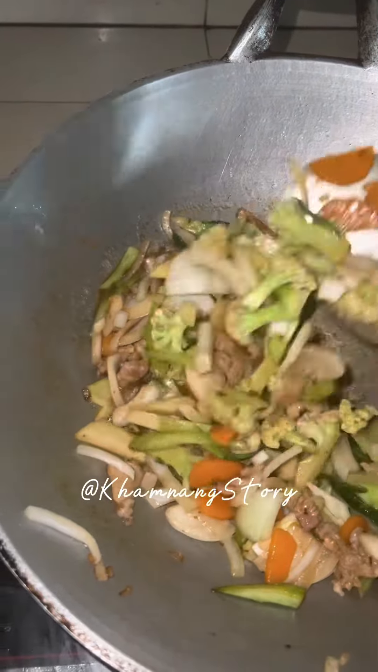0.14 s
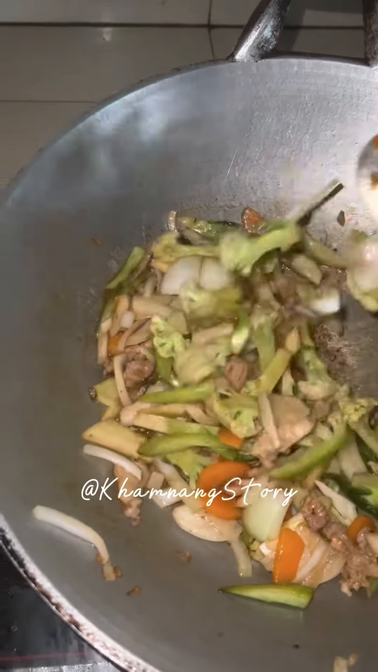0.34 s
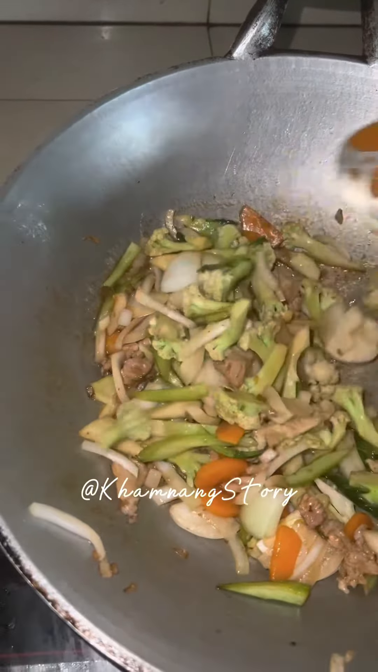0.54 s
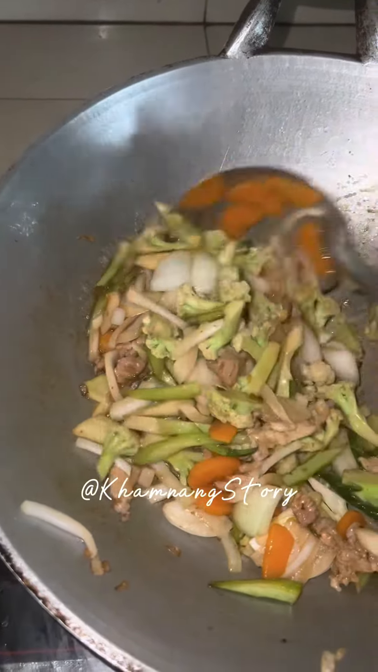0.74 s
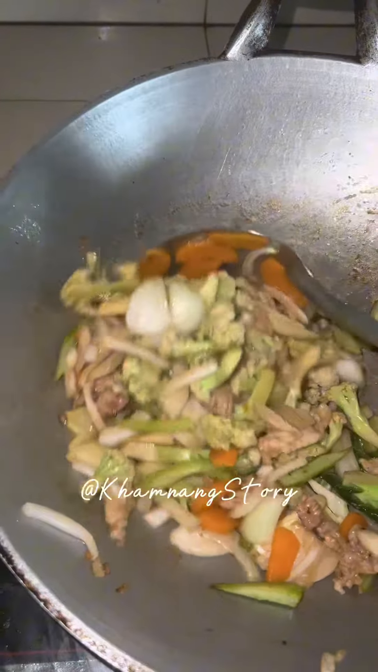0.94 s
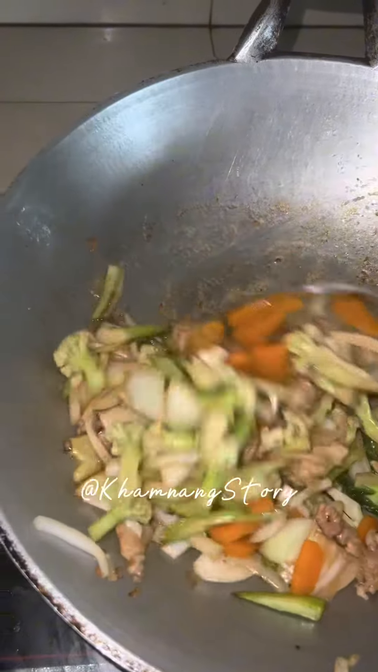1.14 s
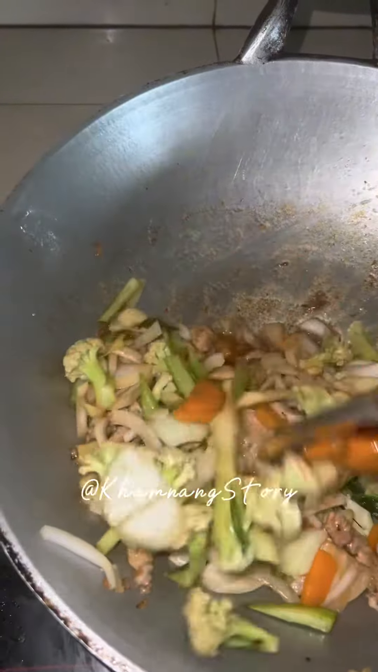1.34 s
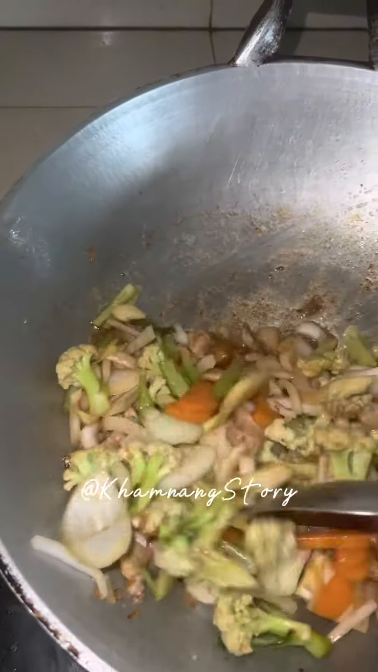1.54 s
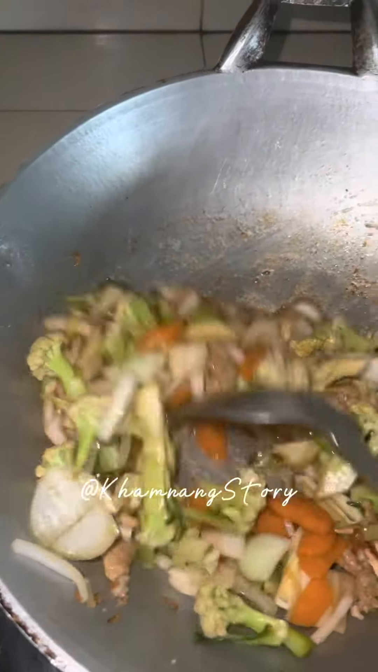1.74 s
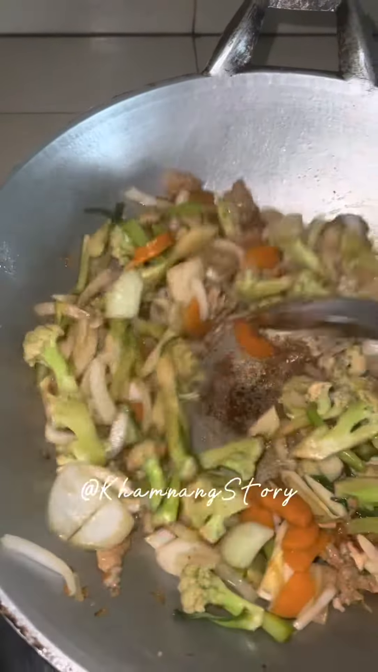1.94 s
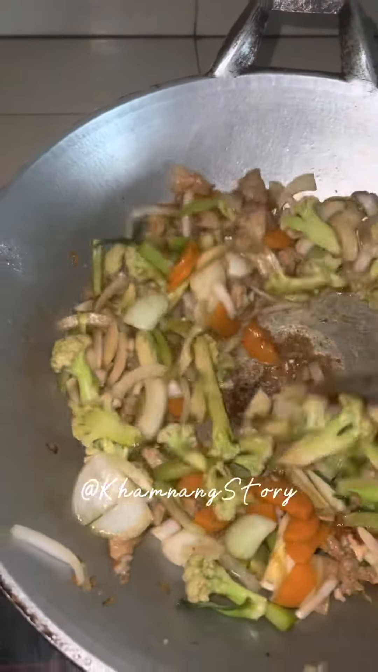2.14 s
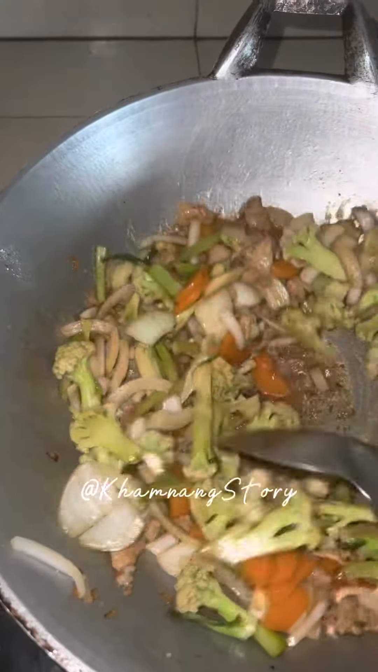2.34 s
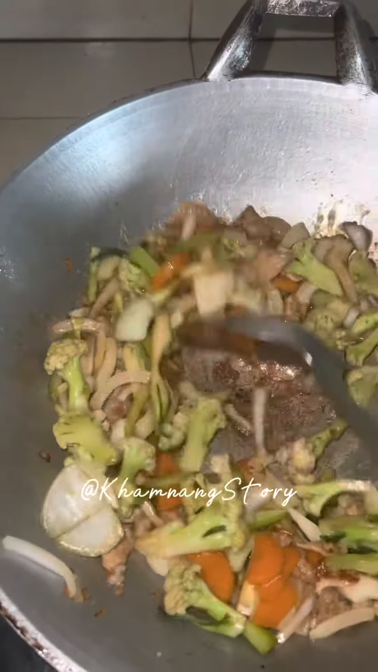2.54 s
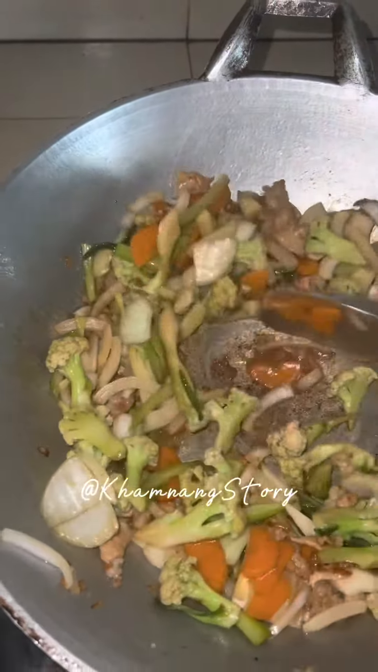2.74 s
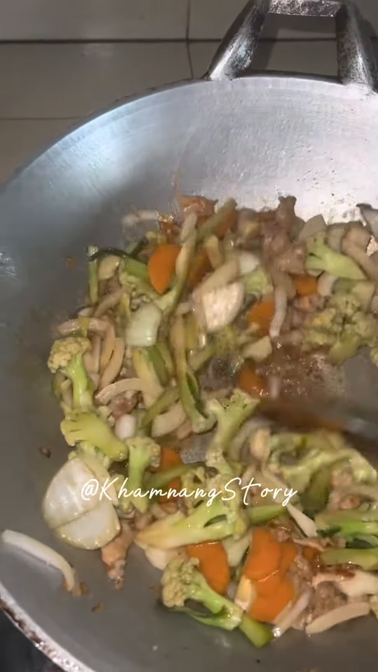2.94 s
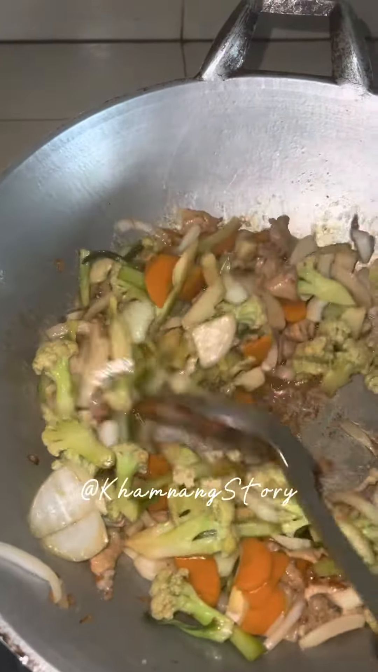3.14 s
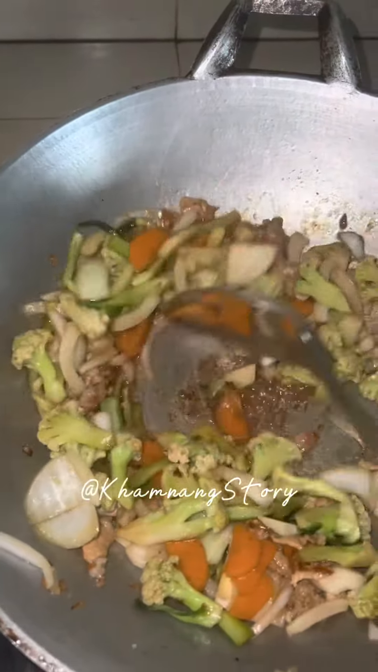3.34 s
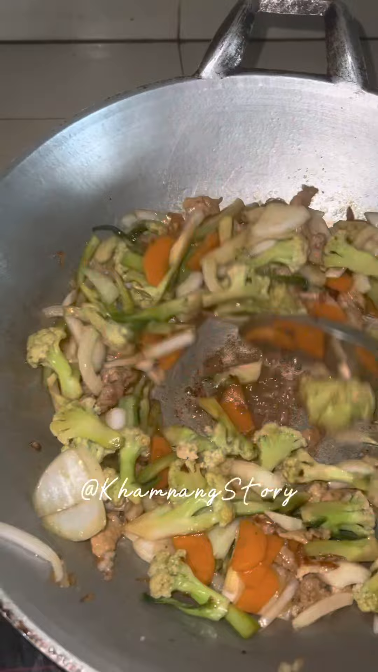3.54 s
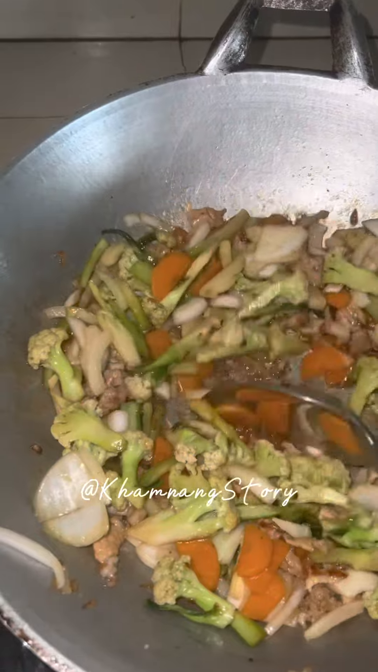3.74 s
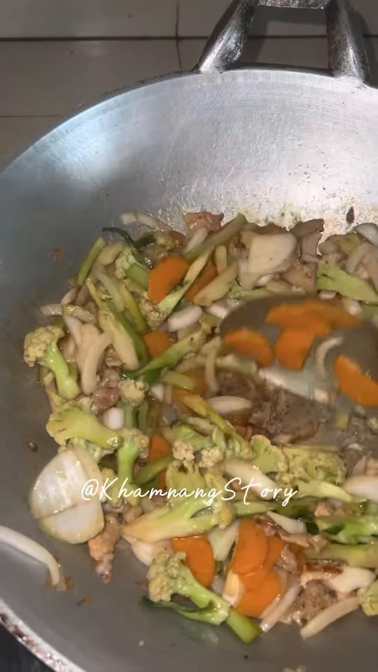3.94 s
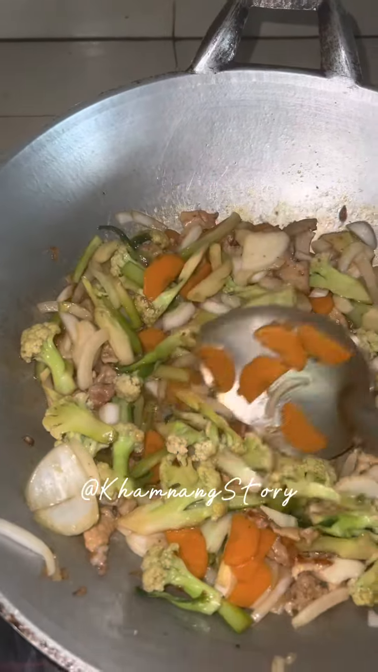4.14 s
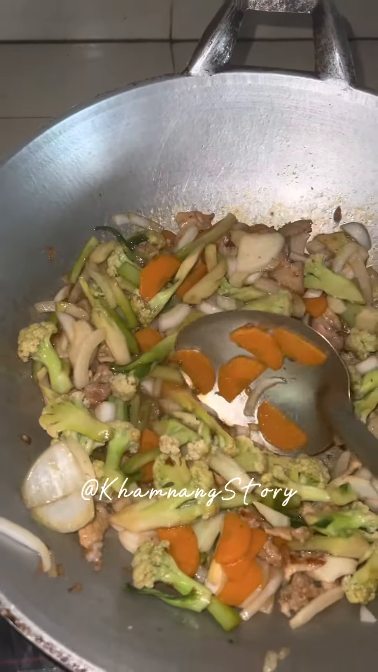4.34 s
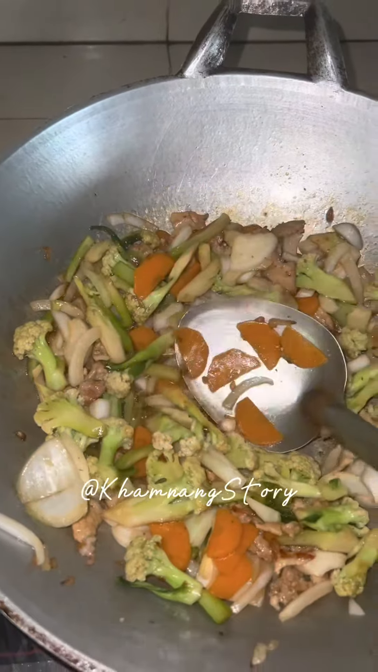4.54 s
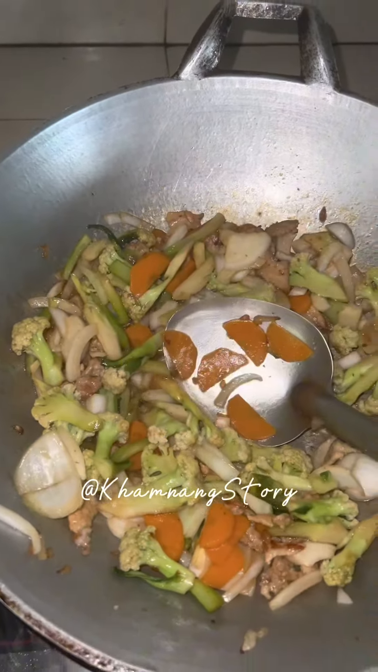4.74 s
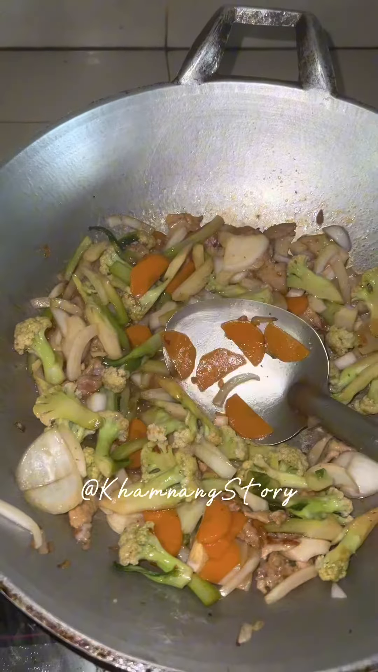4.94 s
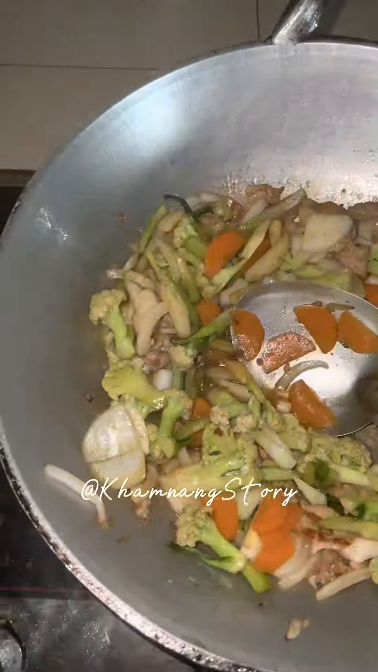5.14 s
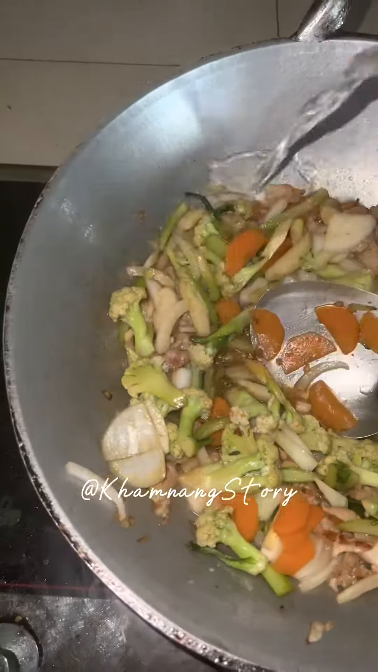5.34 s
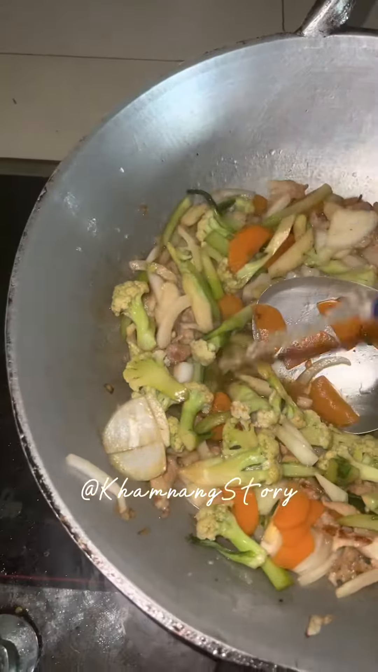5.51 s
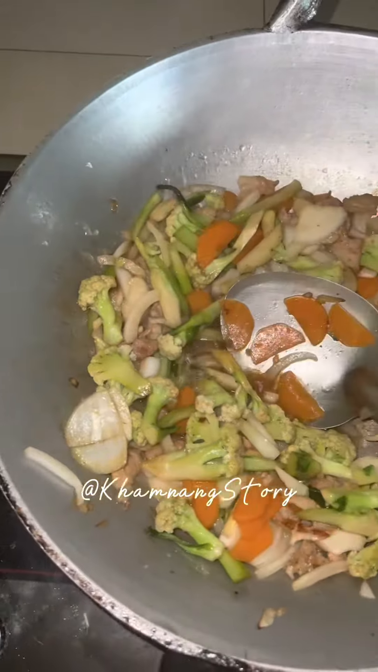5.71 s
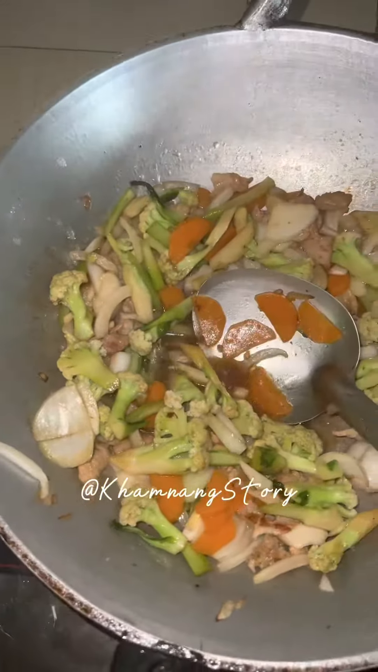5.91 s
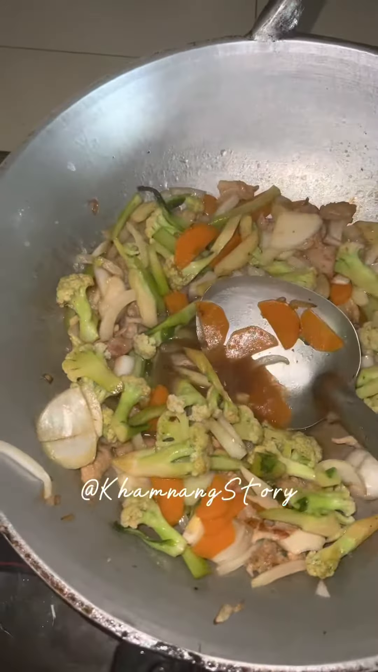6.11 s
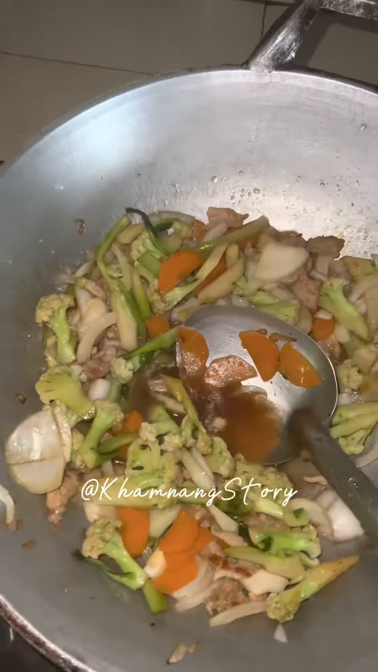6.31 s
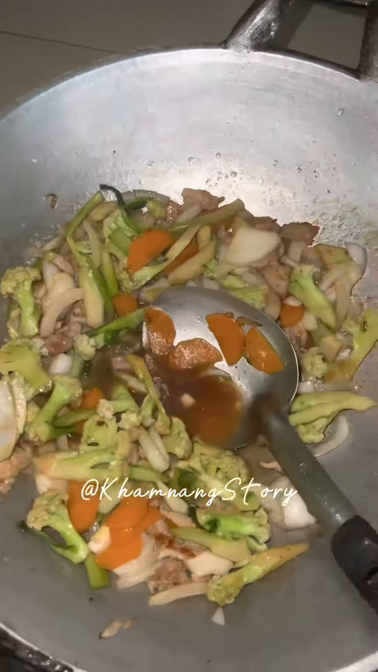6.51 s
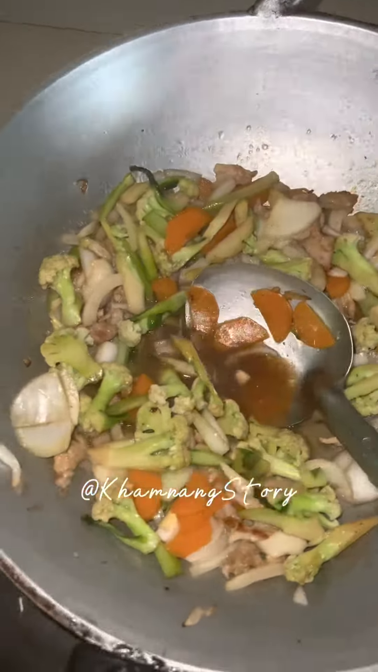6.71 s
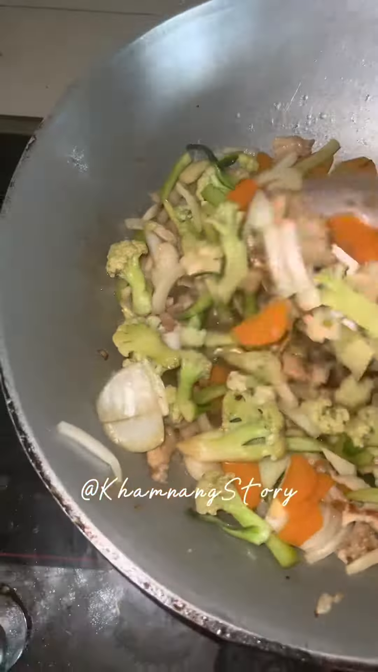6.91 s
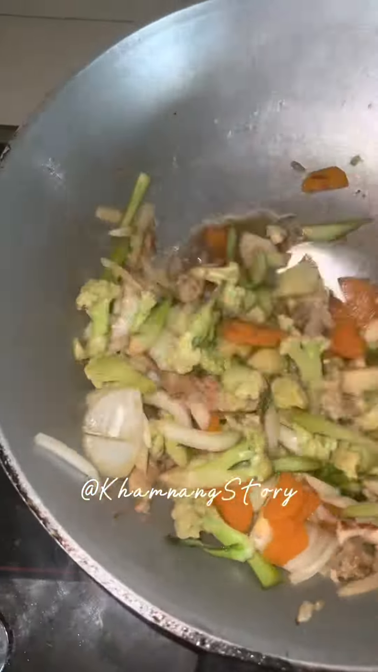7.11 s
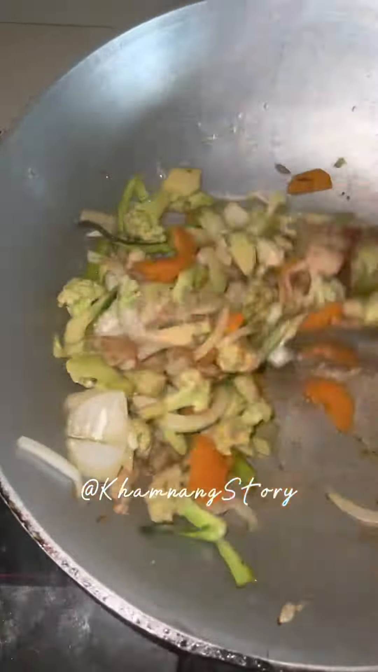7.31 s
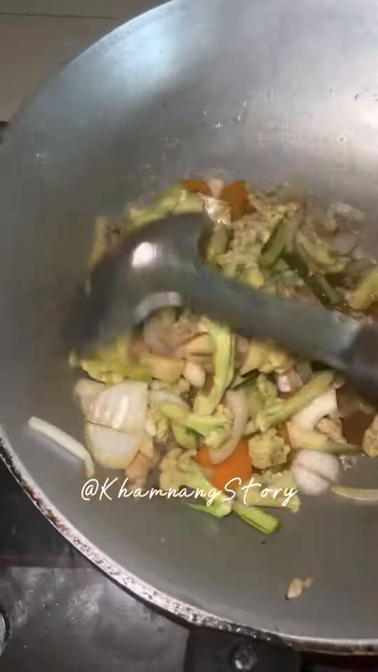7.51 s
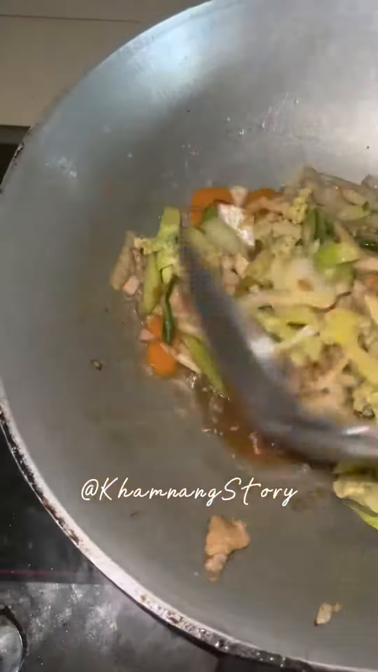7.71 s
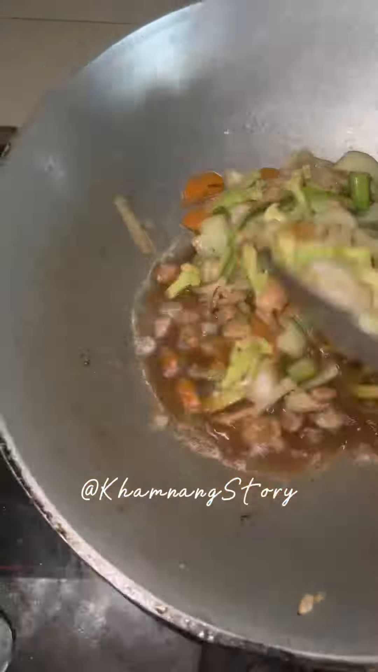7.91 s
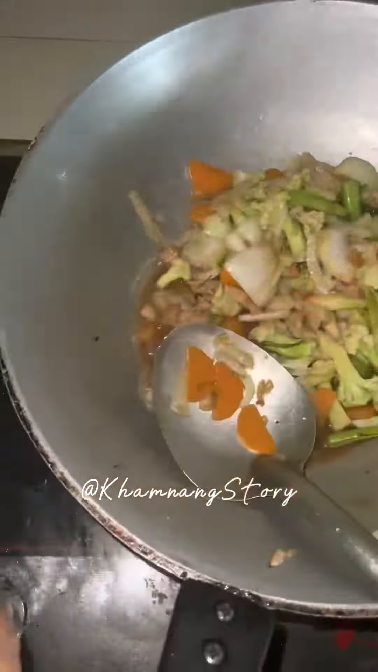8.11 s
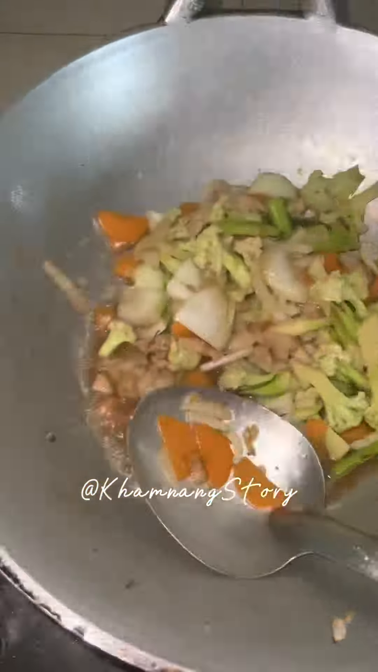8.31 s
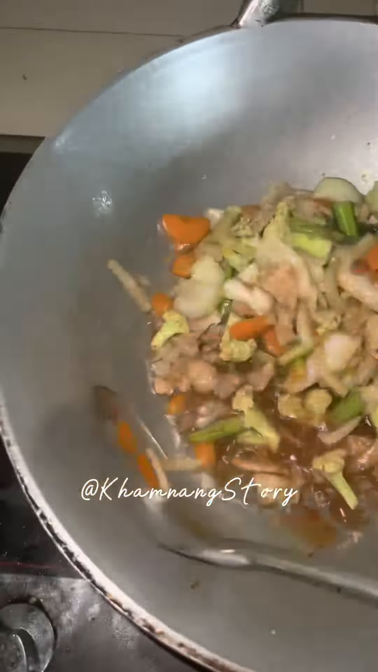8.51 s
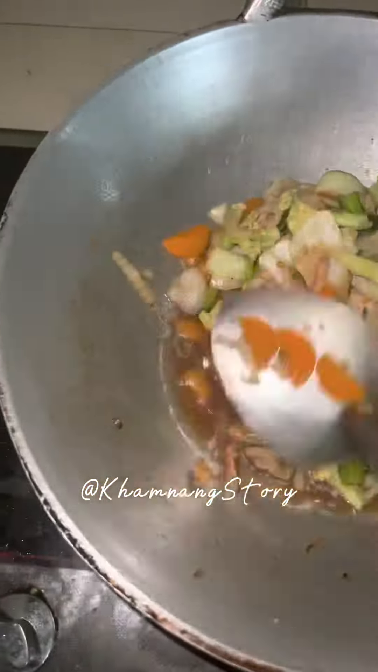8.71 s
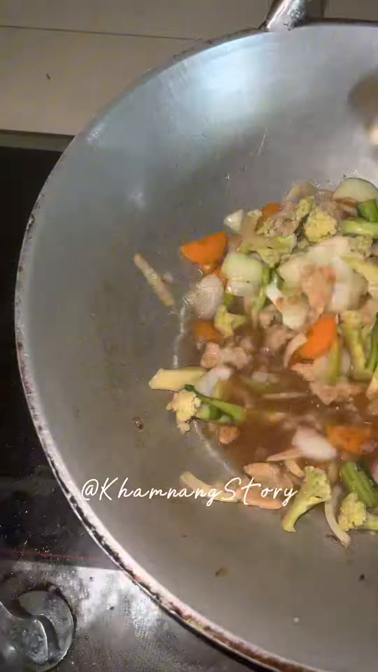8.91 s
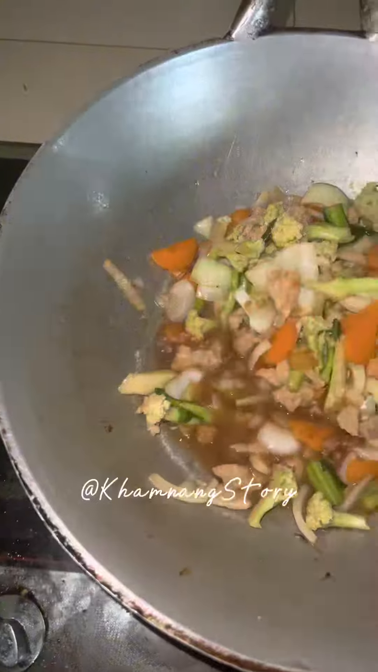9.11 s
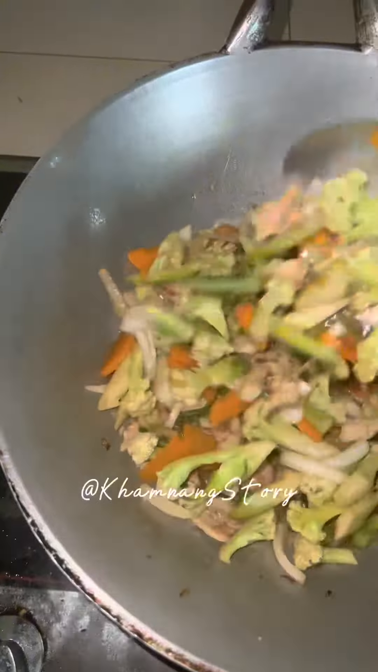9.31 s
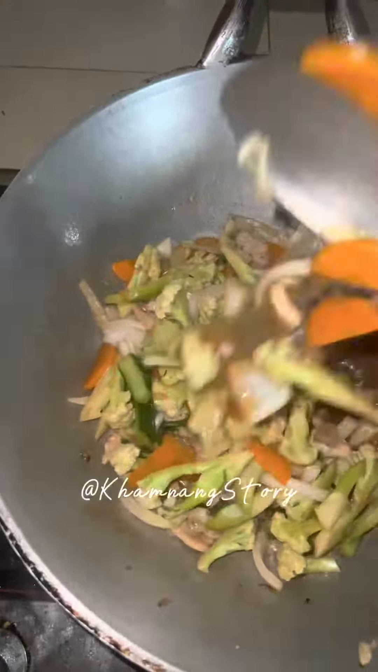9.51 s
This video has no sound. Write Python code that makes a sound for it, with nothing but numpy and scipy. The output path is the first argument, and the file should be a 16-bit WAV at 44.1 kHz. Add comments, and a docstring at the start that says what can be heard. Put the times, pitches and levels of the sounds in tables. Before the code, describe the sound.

A steel ladle works food in a wok, heard very close. First, slow-motion knocks with short damped metallic ring, rough scraping and grainy frying over swelling deep rumble. Around five seconds the pitch of everything glides upward and the sizzle thins and fades; from six and a half seconds, bright hurried taps rattle irregularly to the end.

```python
"""A steel ladle knocks and scrapes a wok of sizzling vegetables over a rumbling burner, close to a phone.
The frying and the burner are shaped noise; blows and strokes ring a bank of fading steel modes.
The scene first plays in slow motion, then speeds up about tenfold, so that the resonances, the rumble
and the colour of the two microphone ports glide upward and the strokes crowd into quick clinks."""
import sys
import numpy as np
from scipy import signal
from scipy.io import wavfile
from scipy.ndimage import uniform_filter1d

SR = 44100
rng = np.random.default_rng(int(sys.argv[2]) if len(sys.argv) > 2 else 0)


def wrap_up_sound(samples):
    """Save the sound to the file named by the first command line argument, as 16-bit audio."""
    columns = np.atleast_2d(samples).T
    # keep every value between -1 and 1, then stretch to whole-number steps
    tamed = np.clip(columns, -1, 1)
    steps = np.round(tamed * 32767).astype(np.int16)
    wavfile.write(sys.argv[1], SR, steps)


def ratio_of_db(decibels):
    """Turn decibels (scalar or array-like) into linear amplitude factors; 0 dB maps to 1."""
    return 10 ** (np.asarray(decibels, float) / 20)


N = 426006  # length in samples

# How fast the scene plays compared with its slow-motion start.
# Each row: time in seconds, speed factor. Pitches below are slow-motion pitches unless called "heard".
SPEED = [(0, 1.003), (5.06, 0.98), (5.12, 2.9), (5.7, 4.86), (6.3, 6.8), (6.79, 8.97), (7.4, 10.86),
         (9.7, 10.33)]
# How differently the two microphone ports hear each pitch.
# Each row: pitch in Hz, likeness of the noise at both ports (0 to 1), left lead in radians,
# left minus right in dB.
PORTS = [(110, 1, -0.23, 0), (227, 0.9, -0.76, 0), (313, 0.73, 1.04, -3.5), (495, 0.86, 1.03, -8),
         (920, 1, -0.55, -1), (1283, 0.98, 1.4, 1), (1800, 0, -2.3, -3), (3240, 0.88, -0.84, 1),
         (4700, 0.84, -1.3, -0.5), (10800, 1, -1.98, 0.5)]
# The clear ringing modes of wok and ladle.
# Each row: pitch in Hz, relative level in dB, time to fade by 60 dB in slow-motion seconds.
WOK = [(186.3, -11.5, 0.25), (225.3, -9.5, 0.17), (295.2, -5.5, 0.12), (355.5, -4, 0.096),
       (409.5, -1, 0.067), (584.6, -15, 0.45), (685, -12, 0.084), (878, -10, 0.055), (1040, -8.5, 0.018),
       (1375, 2, 0.071), (1448, 0, 0.038), (1800, -10.5, 0.022), (2315, -3.5, 0.062), (2900, -4.5, 0.019)]
CROWD_SIZE = 48  # number of quickly damped modes beside the clear ones
TOP_HZ = 15950  # heard upper edge of the steady sounds and of single modes


def evened(x):
    """Scales to rms 1."""
    return x / np.sqrt(np.mean(np.abs(x) ** 2) + 1e-20)


def curve(points, s):
    """Reads a (time, value) table at time s, along straight lines."""
    return np.interp(s, *np.transpose(points))


def read(points, hz, axis=1):
    """Reads one column of a table on a log-frequency axis."""
    columns = np.transpose(points)
    return np.interp(np.log(hz + 1), np.log(columns[0] + 1), columns[axis])


def low_passed(x, hz):
    """Takes away everything above hz with a steep filter."""
    taps = signal.firwin(1023, hz, window=("kaiser", 12), fs=SR)
    return signal.oaconvolve(x, taps[None], "same")


def add(mix, s, sound):
    """Mixes a stereo sound in at time s."""
    part = mix[:, round(s * SR):][:, :sound.shape[1]]
    part += sound[:, :part.shape[1]]


def ports(hz):
    """Each port's gain and phase: half of the difference goes to either side."""
    left = ratio_of_db(read(PORTS, hz, axis=3) / 2) * np.exp(.5j * read(PORTS, hz, axis=2))
    return np.array([left, 1 / left])


def wash(spectrum, level_db, patchy_db, flicker_db, treble=0):
    """Noise built from short random spectra whose colour slides up with the playing speed."""
    # Tilt of the treble, used where treble is 1. Each row: time in seconds, change at 12 kHz heard in dB.
    treble_db = [(5.06, 2.5), (6.1, 6), (8, -7)]
    size = 2048  # samples in one short spectrum
    hop = size // 4
    frames = N // hop + 5
    s = np.arange(frames) * hop / SR
    speed = curve(SPEED, s)
    hz = np.fft.rfftfreq(size, 1 / SR)[:, None] / speed
    heard_hz = hz * speed

    a, b, c, d, patches = rng.standard_normal((frames, size // 2 + 1, 5)).T
    patches = uniform_filter1d(uniform_filter1d(patches, size=24, axis=0), size=6, axis=1)
    patches = evened(patches)
    # both ports share part of the noise
    likeness = np.clip(read(PORTS, hz), 0, 1)
    shared, own = a + 1j * b, c + 1j * d
    stereo = np.array([shared, likeness * shared + np.sqrt(1 - likeness ** 2) * own])

    tilt_db = treble * curve(treble_db, s) * heard_hz / 12000
    colour = ratio_of_db(read(spectrum, hz) + tilt_db) * (heard_hz < TOP_HZ)
    colour /= np.sqrt((colour ** 2).mean(0))
    spectra = stereo * ports(hz) * colour * ratio_of_db(patchy_db * patches)
    noise = signal.istft(spectra, nperseg=size, noverlap=size - hop)[1]

    # short random swells make the level flicker
    swells = evened(uniform_filter1d(rng.exponential(1, N) ** 3, size=90))
    level = level_db + flicker_db * np.minimum(swells - 1, 4)
    return evened(noise[:, :N]) * ratio_of_db(level)


def frying():
    """Sizzle: shaped noise that flares where the ladle turns food onto bare steel."""
    # Colour of the sizzle. Each row: pitch in Hz, relative level in dB per Hz.
    sizzle = [(50, -37), (100, -9), (315, -5), (430, -8), (700, -6), (1330, -4), (2310, -8.5),
              (4100, -13.5), (6000, -16.5), (9700, -22)]
    # Its loudness before flares and flicker. Each row: time in seconds, level in dB.
    sizzle_db = [(0, -42), (0.7, -36), (1.3, -41), (1.7, -37.5), (3.05, -40), (4.2, -38.5), (4.95, -39.5),
                 (5.6, -44.5), (6.35, -47.5), (7.55, -52.5), (8.6, -52), (9.3, -49), (9.64, -48)]
    # Flares. Each row: middle in seconds, rise in dB, half-width in seconds (rise down to 37 %).
    flares = [(2.05, 3, 0.15), (2.451, 7, 0.11), (2.85, 6.5, 0.2), (3.252, 7, 0.089), (7.1, 5.5, 0.26)]
    t = np.arange(N) / SR
    flare_db = sum(db * np.exp(-((t - s) / width) ** 2) for s, db, width in flares)
    noise = wash(sizzle, curve(sizzle_db, t) + flare_db, patchy_db=2.0, flicker_db=3.0, treble=1)
    return low_passed(noise, TOP_HZ)


def burner():
    """Rumble of the burner and the pan stand: patchy low noise that swells and sinks."""
    # Colour of the rumble. Each row: pitch in Hz, relative level in dB per Hz.
    rumble = [(8, -30), (20, -15), (40, -5), (60, -12), (100, -14), (160, -29.5)]
    # Its loudness before flicker. Each row: time in seconds, level in dB.
    rumble_db = [(0, -41.5), (0.5, -47), (1.3, -55), (1.7, -43.5), (2.2, -57.5), (3.4, -42), (5.05, -58),
                 (6.7, -58), (7.2, -50.5), (8.15, -46.5), (9, -58.5), (9.64, -51.5)]
    t = np.arange(N) / SR
    return wash(rumble, curve(rumble_db, t), patchy_db=3.5, flicker_db=2.5)


def ring(speed, bright_db, place, crowd_db=0, favour_hz=None, deep_db=0, length=.6):
    """The steel's answer to one tap; the struck place favours some modes and scatters the damped crowd."""
    # The crowd of modes that the food damps within a few cycles.
    # Each row: pitch in Hz, relative level in dB, time to fade by 60 dB in slow-motion seconds.
    crowd_rows = [(42.6, -23.5, 0.5), (160, -12, 0.1), (422, -4.5, 0.097), (846, -2.5, 0.026),
                  (1410, -3, 0.051), (3030, -4, 0.038), (6723, -18, 0.01)]
    favour_db, favour_octaves = 9.5, 0.17
    dull_hz, dull_db_per_khz = 11170, 1.5  # heard: the ring weakens toward the top

    crowd = np.geomspace(crowd_rows[0][0], crowd_rows[-1][0], CROWD_SIZE)
    crowd = crowd * np.exp(0.068 * place[1, :CROWD_SIZE, 0])
    crowd_level = read(crowd_rows, crowd) + crowd_db
    crowd_fade = read(crowd_rows, crowd, axis=2)
    rows = np.vstack([np.transpose([crowd, crowd_level, crowd_fade]), WOK])
    hz, db, t60 = rows.T[:, :, None]
    t = np.arange(round(length * SR / speed)) / SR * speed  # slow-motion seconds

    db = db + bright_db * np.log2(np.maximum(hz, 450) / 450) + 2 * place[0]
    db = db - dull_db_per_khz * np.maximum(hz * speed - dull_hz, 0) / 1000
    db = db + deep_db * np.clip(np.log2(160 / hz), 0, 1)
    if favour_hz:
        db = db + favour_db * np.exp(-(np.log2(hz / favour_hz) / favour_octaves) ** 2)

    sign = np.sign(place[1])
    sign[:CROWD_SIZE, 0] = (-1) ** np.arange(CROWD_SIZE)  # neighbours alternate: the crowd blends into one body
    modes = sign * ratio_of_db(db) * np.exp((2j * np.pi * hz - np.log(1000) / t60) * t)
    stereo = (ports(hz) * modes * (hz * speed < TOP_HZ)).sum(1).imag
    small_pan = signal.butter(1, 15 * speed, "high", fs=SR)  # a small pan radiates little deep bass
    return signal.lfilter(*small_pan, stereo)


def slips(count, per_sample, spread_db):
    """Stick-slip: irregular small taps of both signs, a few large."""
    size_db = spread_db * np.minimum(rng.exponential(1, count), 4)
    size = ratio_of_db(size_db) * rng.choice([-1., 1.], count)
    return evened(size * (rng.random(count) < per_sample))


def thump(hz, t60, rise):
    """One mode that swells briefly and dies, alike at both ports."""
    t = np.arange(round(t60 * SR)) / SR
    wave = (1 - np.exp(-t / rise)) * ratio_of_db(-60 * t / t60) * np.sin(2 * np.pi * hz * t)
    return wave * np.ones((2, 1))


def rock_pan(out, s, db, speed, place):
    """The pan rocks on its stand: a few deep modes, slightly retuned at each blow."""
    # Each row: pitch in Hz, relative level in dB, both before the random change at each blow.
    stand = [(33, -12), (39.33, -2), (52, -10.5)]
    for (hz, rock_db), loose, lean in zip(stand, place[0, :, 0], place[1, :, 0]):
        rock = thump(hz * speed * np.exp(0.08 * loose), 0.72 / speed, 0.12 / speed)
        add(out, s, ratio_of_db(db + rock_db + 2.6 * lean) * rock)


def blows():
    """Each blow: a grazing touch, the tap, rattling bounces, a short drag, and the pan rocking."""
    # Each row: start in seconds, peak in dB of tap and rattle, thump of the pan on its stand in relative dB,
    # brightness in dB per octave, pitch in Hz that the struck place favours.
    blow_rows = [(0.393, -3, -29, 1, 1570), (0.457, -21, 0.5, -15, 446), (1.661, -20, -24, -4, 367),
                 (1.874, -3, -37, 0.5, 1800), (2.087, -17, -35.5, -1, 1390), (2.752, -13, -35, -6, 300),
                 (2.887, -12.5, -35, -6, 1420), (3.456, -11.5, -33, -4.5, 191), (4.428, -10, -40, -9, 520),
                 (6.433, -20, -29, 0, 327), (6.789, -8.5, -14, -1, 550), (6.942, -6.5, -28, 4.5, 1110),
                 (6.9455, -13, -17, 1, 1100), (7.047, -16, 0, -8, 149), (7.348, -12.5, -14, 2.5, 1130),
                 (7.3515, -15, -3, 2, 243), (7.438, -9, -25, 6, 1140), (7.478, -19, -20, -1, 550),
                 (7.596, -12.5, -12.5, -6, 535), (7.717, -14, -13, 3.5, 505), (7.82, -10, -16.5, -1, 535),
                 (7.969, -10.5, -30, 4, 600), (7.98, -19, -27, -9, 630), (8.044, -27, -12, -3, 500),
                 (8.201, -26.5, -4, -5, 296), (8.23, -29, -1, -15, 328), (8.249, -30, -11, -6, 400),
                 (8.275, -27.5, -9, -4, 400), (8.377, -13, -18, 1, 168), (8.49, -11.5, -4, 1, 1056),
                 (8.764, -28.5, -6, 5, 1100), (9.127, -11, -7, 2, 213), (9.216, -10.5, -6, 3.5, 465),
                 (9.367, -6.5, -8, 0.5, 1220), (9.403, -21.5, -27, 10, 503), (9.592, -24, -26, 2.5, 278)]
    # The ladle drags on after a blow. Each row: time in seconds, relative level in dB.
    drag_db = [(5, -32), (6.4, -17.5)]
    out = np.zeros((2, N))
    places = rng.standard_normal((len(blow_rows), 2, CROWD_SIZE + len(WOK), 1))
    for (s, db, thump_db, bright_db, favour_hz), place in zip(blow_rows, places):
        speed = curve(SPEED, s)
        tap = round(SR * (.0015 + .002 / speed))  # samples from the first touch to the tap
        t = (np.arange(round(.6 * SR / speed)) - tap) / SR * speed  # slow-motion seconds from the tap

        rattle = slips(len(t), 0.013 * speed, spread_db=3.0) / np.sqrt(SR / speed / 1000)
        rattle = rattle * ratio_of_db(-10 * (t < 0))  # weaker before the tap
        drive = rattle * ratio_of_db(-12.5 - 60 * abs(t) / 0.07)
        drive[tap] = 1

        # deep modes move as the pan rocks
        steel = ring(speed, bright_db, place, favour_hz=favour_hz, deep_db=thump_db + 14.5)
        steel /= np.abs(steel.mean(0)).max()
        crack = ratio_of_db(-5 - 60 * t / 0.0034) * (t >= 0)  # the bare contact, a push without ring
        struck = signal.fftconvolve(drive[None], steel, axes=1)
        struck[:, :len(t)] += crack
        add(out, s, ratio_of_db(db) * struck / np.abs(struck.mean(0)).max())

        pressed = steel * ratio_of_db(-60 * (t - t[0]) / 0.03)  # the dragging ladle damps the ring
        drag = rattle * ratio_of_db(curve(drag_db, s) - 60 * abs(t) / 1.0)
        scrape = low_passed(signal.fftconvolve(drag[None], pressed, axes=1), TOP_HZ)
        add(out, s, ratio_of_db(db) * scrape)
        rock_pan(out, s + tap / SR, db + thump_db, speed, place)
    knock_handle(out)
    return low_passed(out, 16600)  # heard upper edge in Hz


def strokes():
    """Slips of the ladle edge excite the steel in uneven judders; a harder edge brings out the upper modes."""
    # Strokes along the steel. Each row: start in seconds, time held in seconds, level in dB before judder,
    # level of the edge sound in dB relative to the body sound.
    stroke_rows = [(1.5, 0.27, -46.5, 1.5), (1.92, 0.89, -42, -1), (2.045, 0.098, -30, -4),
                   (2.26, .012, -27, -14), (2.405, 0.05, -31, -4), (2.638, 0.013, -34.5, -11),
                   (2.784, 0.091, -17.5, -7), (2.95, 0.087, -37.5, -13), (3.17, 0.048, -34.5, -15),
                   (3.501, 0.11, -40.5, -2.5), (7.455, 0.017, -41, -1), (7.484, .011, -37.5, -2),
                   (7.602, 0.017, -42.5, 1), (7.827, 0.013, -39.5, 2)]
    press_rate, lift_rate = 906, 283  # dB per slow-motion second: how fast a stroke bites and lets go
    out = np.zeros((2, N))
    places = 0.17 * rng.standard_normal((len(stroke_rows), 2, CROWD_SIZE + len(WOK), 1))
    for (start, held, db, edge_db), place in zip(stroke_rows, places):
        speed = curve(SPEED, start)
        lead = 60 / press_rate / speed  # seconds of fade-in ahead of the start
        t = np.arange(-lead, held + 60 / lift_rate / speed, 1 / SR)
        press_db = speed * (press_rate * np.minimum(t, 0) - lift_rate * np.maximum(t - held, 0))
        wobble = uniform_filter1d(rng.standard_normal(len(t)), size=round(700 / speed))
        judder_db = 2.5 * evened(wobble)
        place[1, CROWD_SIZE:] = 1  # all clear modes start with the same sign

        # body, then edge; slips hardly move the whole pan, so the lows are cut
        body = (db, -5, -12.5, 185, .1)
        edge = (db + edge_db, -2.2, -8, 800, .5)
        for level_db, bright_db, crowd_db, low_hz, width in (body, edge):
            steel = ring(speed, bright_db, place, crowd_db=crowd_db, length=.25)
            low_cut = signal.butter(4, low_hz * speed, "high", fs=SR, output="sos")
            steel = signal.sosfilt(low_cut, steel)
            # the ladle damps the ring
            pressed = steel * ratio_of_db(-60 * np.arange(steel.shape[1]) / SR * speed / 0.29)
            pressed = pressed / np.linalg.norm(pressed.mean(0))
            middle = slips(len(t), .025 * speed, spread_db=3.0)
            wide = slips(len(t), 0.022 * speed, spread_db=1.5)
            # further slips, opposite in sign at the two ports, widen the scrape
            drive = np.array([middle + width * wide, middle - width * wide])
            drive = drive * ratio_of_db(level_db + press_db + judder_db)
            add(out, start - lead, signal.fftconvolve(drive, pressed, axes=1))
    return low_passed(out, TOP_HZ)


def knock_handle(out):
    """The handle strikes the rim once: a few modes swell fast and die."""
    # Each row: heard pitch in Hz, level in dB, time to fade by 60 dB in seconds.
    handle = [(673, -22.5, 0.15), (2710, -35, 0.047), (5670, -26.5, 0.031)]
    for hz, db, t60 in handle:
        add(out, 6.431, ratio_of_db(db) * thump(hz, t60, 0.0016))


def scene():
    """Frying, burner, blows (with the handle's knock) and strokes."""
    return frying() + burner() + blows() + strokes()


def slow_motion(dry):
    """Slow motion draws straight lines between sparse samples, which mirrors the treble."""
    slow_end_s, edge_hz = 5.06, 9700
    at = np.arange(N)
    # every second sample is kept
    lines = np.array([np.interp(at, at[::2], channel[::2]) for channel in low_passed(dry, edge_hz)])
    slow = np.clip((slow_end_s - at / SR) / .004, 0, 1)  # 1 in slow motion, then a 4 ms fade to 0
    return slow * low_passed(lines, TOP_HZ) + (1 - slow) * dry


def roll_off(x):
    """The treble ends steeply here."""
    return signal.sosfilt(signal.butter(12, 17140, fs=SR, output="sos"), x)


def record(dry):
    """Gives the opening its slow-motion treble and returns the finished sound."""
    mix = slow_motion(dry)
    return roll_off(mix)


dry = scene()
out = record(dry)
wrap_up_sound(out)
```